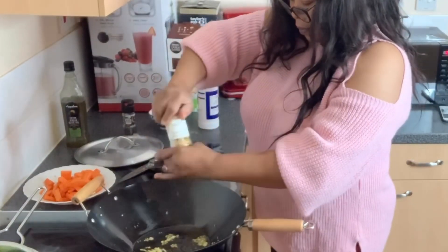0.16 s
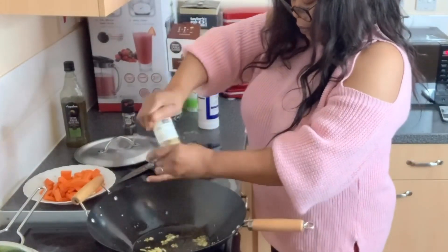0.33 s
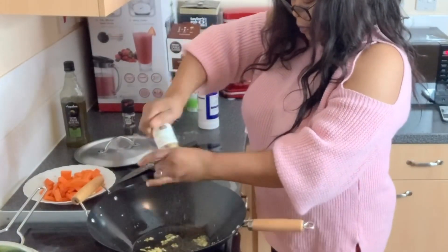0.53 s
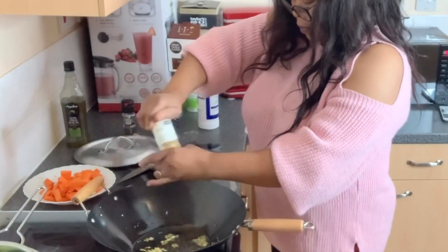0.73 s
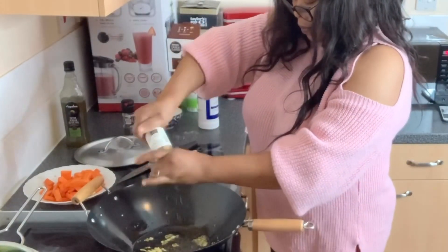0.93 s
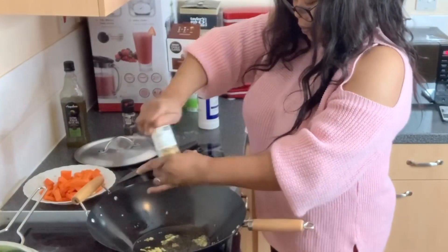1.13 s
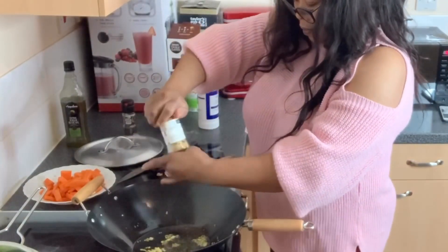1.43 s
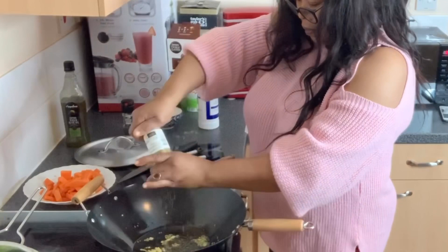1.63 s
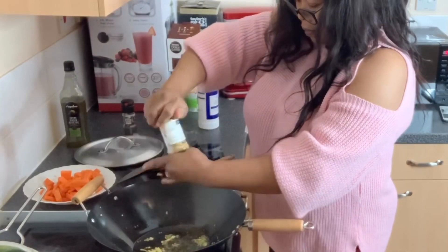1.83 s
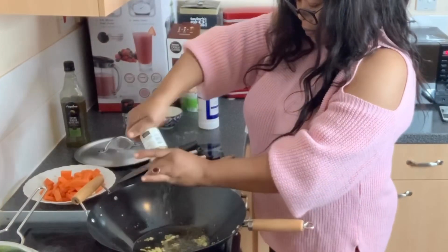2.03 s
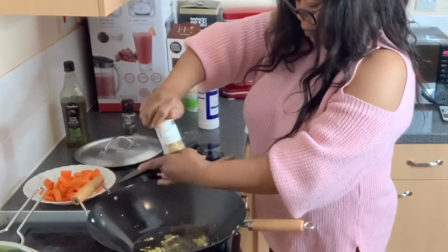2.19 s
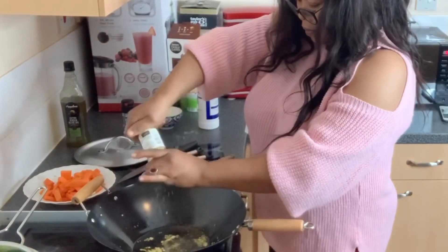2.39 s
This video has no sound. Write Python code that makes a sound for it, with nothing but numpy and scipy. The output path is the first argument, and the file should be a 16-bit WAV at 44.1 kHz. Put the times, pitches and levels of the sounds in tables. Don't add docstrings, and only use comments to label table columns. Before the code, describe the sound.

A small seasoning jar shaken in quick strokes, dry grains rattling sharply in a home kitchen

```python
import sys
import numpy as np
from scipy import signal
from scipy.fft import rfft, irfft
from scipy.io import wavfile
from scipy.ndimage import uniform_filter1d

SR = 44100
rng = np.random.default_rng(int(sys.argv[2]) if len(sys.argv) > 2 else 0)


def persist_wave(psi):
    counts = np.round(np.clip(psi, -1, 1) * 32767).astype(np.int16)
    wavfile.write(sys.argv[1], SR, np.atleast_2d(counts).T)


def boost(x):
    u = np.asarray(x, float) / 20
    return 10 ** u


N = 112454

# start t/s, rise t/s, hold t/s, level/dB
STROKES = [(0.03, 0.0033, 0.078, -49), (0.23, 0.0028, 0.056, -39), (0.259, 0.0036, 0.078, -29.5),
           (0.461, 0.052, 0.022, -43.5), (0.628, 0.042, 0.0088, -40), (0.663, 0.011, 0.1, -29),
           (0.863, 0.049, 0.016, -39.5), (1.068, 0.0059, 0.011, -31), (1.087, 0.039, 0.035, -31.5),
           (1.234, 0.039, 0.085, -45.5), (1.436, 0.05, 0.079, -33.5), (1.667, 0.031, 0.065, -47.5),
           (1.838, 0.0033, 0.0092, -39), (1.852, 0.01, 0.092, -31), (1.985, .01, 0.058, -48),
           (2.056, 0.011, 0.081, -49), (2.227, 0.016, 0.082, -32.5), (2.382, 0.02, 0.021, -48),
           (2.423, 0.016, 0.054, -45.5)]
# t/s, peak level/dB
CRACKS = [(0.179, -32.5), (0.2376, -23.5), (0.2663, -21.5), (0.2866, -21), (0.6779, -22), (0.7557, -27.5),
          (0.8711, -31.5), (0.9076, -40), (1.0758, -32), (1.1498, -19), (1.4835, -26), (1.5626, -31),
          (1.8649, -25), (1.9032, -25), (2.0645, -20), (2.2494, -20.5), (2.303, -45)]
# t/s, peak level/dB, pitch f/Hz, upper tone level/dB
KNOCKS = [(.040, -35.5, 2550, 3), (0.063, -32.5, 2460, -6), (0.534, -39, 3650, -7), (.896, -29, 3880, -6),
          (1.077, -38, 2480, -12), (1.741, -22.5, 2530, 1), (1.874, -27, 4130, -13),
          (1.997, -33, 3930, -11), (2.068, -31, 2300, 5), (2.104, -24.5, 3920, -21),
          (2.249, -30, 2600, -5.5), (2.369, -24, 2610, -1.5), (2.449, -37, 3030, -8)]
# ratio to pitch, level/dB
CAP_TONES = [(0.719, -5), (0.861, 2), (1.001, 10), (1.13, -11)]
# f/Hz, level/dB
RATTLE_COLOUR = [(300, -27), (900, -14.5), (1300, -8.5), (2500, -3), (5500, 0), (8500, -2), (12000, 0),
                 (16000, -6)]
# f/Hz, width f/Hz, level/dB
JAR_TONES = [(1261, 32.5, 0), (1580, 51, -6.5), (1772, 147, -8.5), (1990, 30, -16), (2385, 120, -9),
             (3370, 99, -16.5), (5060, 99, -23.5), (6270, 450, -13.5)]
# f/Hz, width f/Hz, level/dB
BODY_TONES = [(253, 31, -34.5), (379, 10, -34), (390, 13, -49.5), (637, 270, -36)]
# f/Hz, level/dB
HUM = [(51, -73), (100, -76), (200, -72.5)]
# f/Hz, level/dB
HISS_COLOUR = [(18, -40), (30, 0.5), (166, -14), (315, -21.5), (520, -8), (748, -30.5), (1480, -10),
               (1630, -13.5), (7000, -12), (9100, -62), (15400, -120)]
# 0 middle or 1 side, low f/Hz, high f/Hz, share of time
WEAK_BANDS = [(0, 7200, 7700, .15), (0, 7700, 8300, .7), (0, 8300, 10000, 1), (0, 10000, 10400, .6),
              (0, 10400, 11000, .2), (0, 15300, 16000, .2), (1, 11300, 11800, .15), (1, 11800, 12500, .6),
              (1, 12500, 17000, 1)]

RELEASE_T60_S, BODY_LAG_S = 0.081, 0.0161
GRAINS_PER_S, GRAIN_SPREAD_DB, SMOOTH_DB = 5000, 2, -5.5
CLUMP_DB, CLUMP_RATE_HZ = 2.5, 44
COARSE_PER_S, COARSE_SPREAD_DB, COARSE_CYCLES, COARSE_DB = 900, 4.5, 32, -3.5
PATCH_DB, PATCH_RATE_HZ = 2.5, 10.2
CRACK_T60_S, CRACK_RISE_S = 0.022, 0.0011
KNOCK_T60_S, CAP_WIDTH_HZ, UPPER_RATIO, UPPER_WIDTH_HZ = 0.029, 330, 1.75, 800
ROOM_T60_S, ROOM_HIGH_T60_S, EARLY_DB = 0.35, 0.29, -11.5
ROOM_DB, WIDE_DB, WIDE_CUT_HZ = -7.5, -2.5, 9000
FRIDGE_HZ, FRIDGE_DB = 511.5, -62
THROB_HZ, THROB_DEPTH, THROB_PEAK_S = 8.3, 1, 0.074
HISS_DB, RIGHT_LAG_S = -57.5, 5.4e-5
CUTOFF_HZ, LOW_CUT_HZ = 15900, 42
ONSET_RISE_DB, ONSET_SPAN_S = 11, 0.02
FRAME, GRID = 1024, 824


def rattle():
    born = rng.random(N) < GRAINS_PER_S / SR
    sizes = boost(GRAIN_SPREAD_DB * np.minimum(rng.exponential(1, N), 5)) * rng.choice([-1, 1], N)
    fine = rms_one(born * sizes) + boost(SMOOTH_DB) * rng.standard_normal(N)
    clumps = boost(CLUMP_DB * drift(CLUMP_RATE_HZ))
    grains = (fine + boost(COARSE_DB) * coarse_grains()) * clumps

    hits = rms_one(grains) * strokes(lag_s=0) + cracks()
    scale = rms_one(shaped(grains, RATTLE_COLOUR)).std() / shaped(rms_one(grains), RATTLE_COLOUR).std()
    wall = sum(boost(db + 7) * resonate(hits, hz, width) for hz, width, db in JAR_TONES)
    bright = scale * shaped(hits + wall, RATTLE_COLOUR)

    late = rms_one(grains) * strokes(lag_s=BODY_LAG_S)
    body = sum(boost(db + 23.5) * resonate(late, hz, width) for hz, width, db in BODY_TONES)
    return boost(2) * bright + body


def strokes(lag_s):
    t = np.arange(N) / SR - lag_s
    power = 1e-14
    for start, rise, hold, level_db in STROKES:
        up = np.clip((t - start) / max(rise, 1e-3), 0, 1) ** 2
        since_hold = np.maximum(t - start - rise - hold, 0)
        power = power + (up * boost(level_db - 60 * since_hold / RELEASE_T60_S)) ** 2
    return np.sqrt(power)


def coarse_grains():
    born = rng.random(N) < COARSE_PER_S / SR
    spread = boost(COARSE_SPREAD_DB * np.minimum(rng.exponential(1, N), 4))
    sizes = born * spread * rng.choice([-1, 1], N)
    pitch_of = rng.integers(0, 20, N)
    total = np.zeros(N)
    for k, hz in enumerate(np.geomspace(1100, 11000, 20)):
        patch = sizes * (pitch_of == k) * boost(PATCH_DB * drift(PATCH_RATE_HZ))
        ring = resonate(patch + 1e-18, hz, 1.73 * hz / COARSE_CYCLES)
        total += rms_one(ring) * np.sqrt(hz / 3000)
    return rms_one(total)


def cracks():
    size = 900
    out, t = np.zeros(N + size), np.arange(size) / SR
    for start, db in CRACKS:
        burst = rng.standard_normal(size) * np.minimum(t / CRACK_RISE_S, 1)
        i = int(start * SR)
        out[i:i + size] += boost(db + 1 - 60 * t / CRACK_T60_S) * burst
    return out[:N]


def knocks():
    size = 3000
    out, t = np.zeros(N + size), np.arange(size) / SR
    for start, db, hz, upper_db in KNOCKS:
        scuff = rng.standard_normal(size) * boost(-60 * t / KNOCK_T60_S)
        ring = np.zeros(size)
        for k, (ratio, tone_db) in enumerate(CAP_TONES):
            ring += boost(tone_db) * resonate(scuff, hz * ratio, CAP_WIDTH_HZ) * (-1) ** k
        upper_hz = hz * UPPER_RATIO
        upper = resonate(scuff, upper_hz, UPPER_WIDTH_HZ)
        ring += boost(upper_db) * resonate(upper, upper_hz, 2 * UPPER_WIDTH_HZ)
        i = int(start * SR)
        out[i:i + size] += boost(db + 2) * ring / np.abs(ring).max()
    return out[:N]


def kitchen(x, room_db):
    t = np.arange(SR // 2) / SR
    echoes = (rng.random(len(t)) < 0.02) * (t < 0.03)
    noise = rng.standard_normal(len(t)) * (t > 0.002) * (1 + boost(EARLY_DB) * 9 * echoes)
    low = signal.sosfilt(signal.butter(1, 4000, fs=SR, output="sos"), noise)
    tail = low * boost(-60 * t / ROOM_T60_S) + (noise - low) * boost(-60 * t / ROOM_HIGH_T60_S)
    return boost(room_db) * signal.fftconvolve(x, tail / np.sqrt(np.sum(tail ** 2)))[:N]


def appliances():
    t = np.arange(N) / SR
    hum = sum(boost(db + 2.0 * drift(4.5)) * np.sin(2 * np.pi * hz * t) for hz, db in HUM)
    swing = np.cos(2 * np.pi * THROB_HZ * (t - THROB_PEAK_S))
    throb = np.sqrt(1 + np.clip(THROB_DEPTH, 0, 1) * swing)
    fridge = boost(FRIDGE_DB + 2.1 * drift(5.1)) * throb * np.sin(2 * np.pi * FRIDGE_HZ * t)
    return hum + fridge


def background_hiss():
    colour = HISS_COLOUR[:-1] + [(7000, -20), (16000, -13.5)]
    return boost(HISS_DB) * rms_one(shaped(rng.standard_normal((3, N)), colour))


def shaped(x, points):
    hz = np.fft.rfftfreq(x.shape[-1], 1 / SR) + 1
    p = np.array(points)
    gain = boost(np.interp(np.log(hz), np.log(p[:, 0]), p[:, 1]))
    return irfft(rfft(x) * gain, x.shape[-1])


def rms_one(x):
    return x / np.sqrt(np.mean(x ** 2) + 1e-20)


def resonate(x, hz, width):
    r = np.exp(-np.pi * width / SR)
    feedback = [1, -2 * r * np.cos(2 * np.pi * hz / SR), r * r]
    return signal.lfilter([(1 - r * r) / 2, 0, (r * r - 1) / 2], feedback, x)


def drift(rate_hz):
    r = np.exp(-2 * np.pi * rate_hz / SR)
    return rms_one(signal.lfilter([1], [1, -2 * r, r * r], rng.standard_normal(N + SR))[SR:])


def scene():
    jar, hum, hiss = rattle() + knocks(), appliances(), background_hiss()
    near = jar + kitchen(jar, ROOM_DB) + hiss[0]
    wide = np.array([kitchen(jar, WIDE_DB), kitchen(jar, WIDE_DB)]) + boost(-0.5) * hiss[1:]
    wide = signal.sosfilt(signal.butter(2, WIDE_CUT_HZ, fs=SR, output="sos"), wide)
    delay = np.exp(-2j * np.pi * np.fft.rfftfreq(N, 1 / SR) * RIGHT_LAG_S)
    left = near + hum
    right = irfft(rfft(near) * delay, N) + boost(0.5) * np.roll(hum, 14)
    return np.array([left, right]) + wide


def roll_off(x):
    return signal.sosfilt(signal.butter(12, 16970, fs=SR, output="sos"), x)


def record(dry):
    hz, span = np.fft.rfftfreq(N, 1 / SR), int(ONSET_SPAN_S * SR)
    limits = (hz < CUTOFF_HZ) / (1 + (LOW_CUT_HZ / (hz + 1)) ** 4)
    pair = rfft([dry[0] + dry[1], dry[0] - dry[1]]) / 2 * limits

    level_db = 10 * np.log10(uniform_filter1d(np.sum(dry ** 2, axis=0), size=300) + 1e-14)
    rise_db = np.roll(level_db, -span // 2) - np.roll(level_db, span // 2)
    steady = rise_db < ONSET_RISE_DB

    out = irfft(pair, N)
    frame_of = (np.arange(N) + FRAME - GRID) // FRAME
    luck = uniform_filter1d(rng.standard_normal((len(WEAK_BANDS), N // FRAME + 2)), size=3)
    for (k, low, high, share), z in zip(WEAK_BANDS, luck):
        dropped = (z <= np.quantile(z, share))[frame_of] & steady
        band = irfft(pair[k] * (hz > low) * (hz <= high), N)
        out[k] -= band * uniform_filter1d(dropped * 1.0, size=128)
    mix = np.array([out[0] + out[1], out[0] - out[1]])
    return roll_off(mix)


dry = scene()
out = record(dry)
persist_wave(out)
```